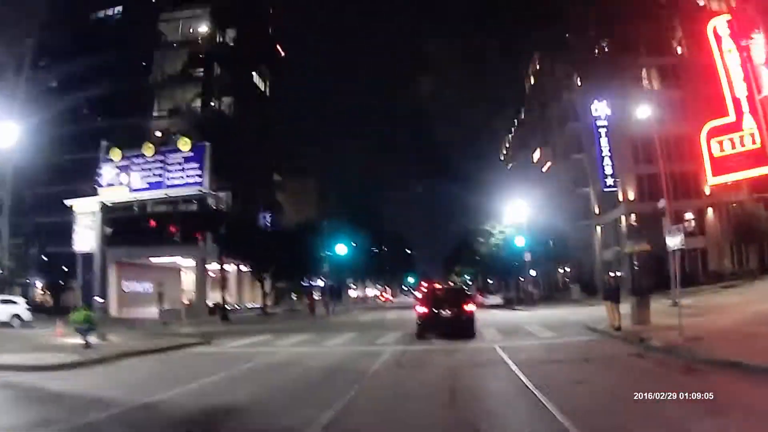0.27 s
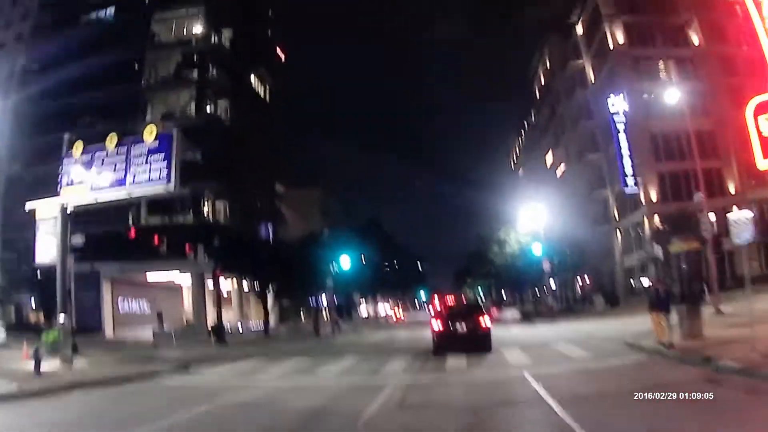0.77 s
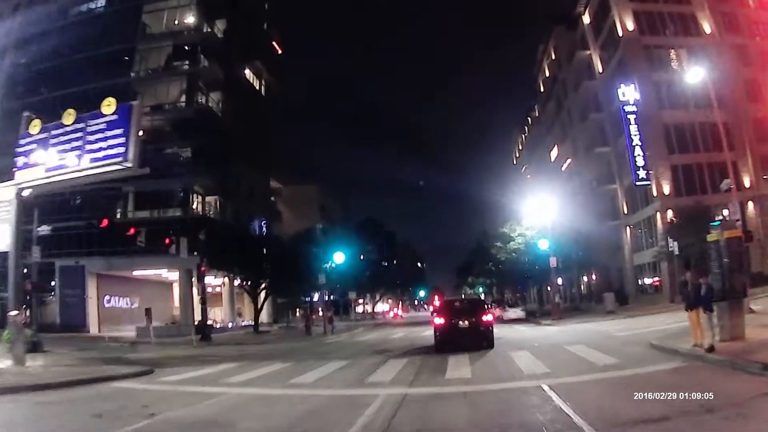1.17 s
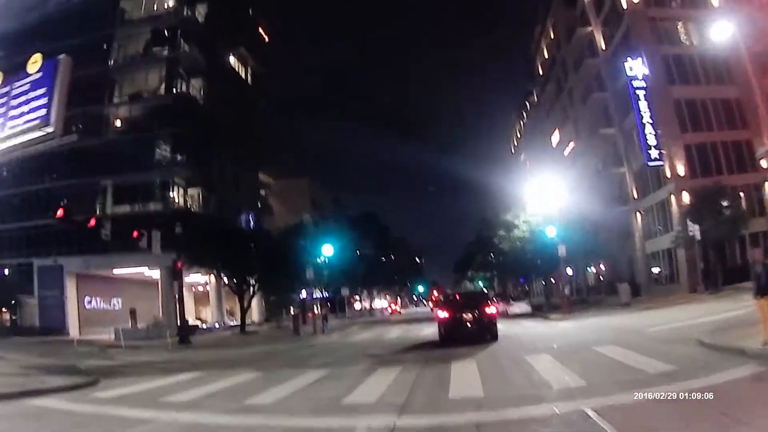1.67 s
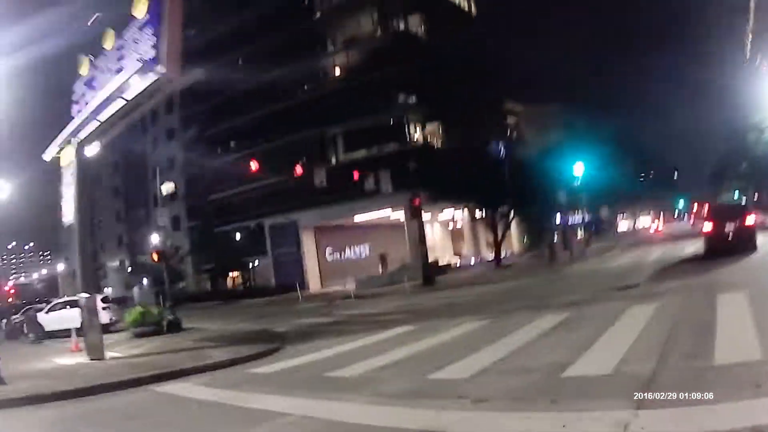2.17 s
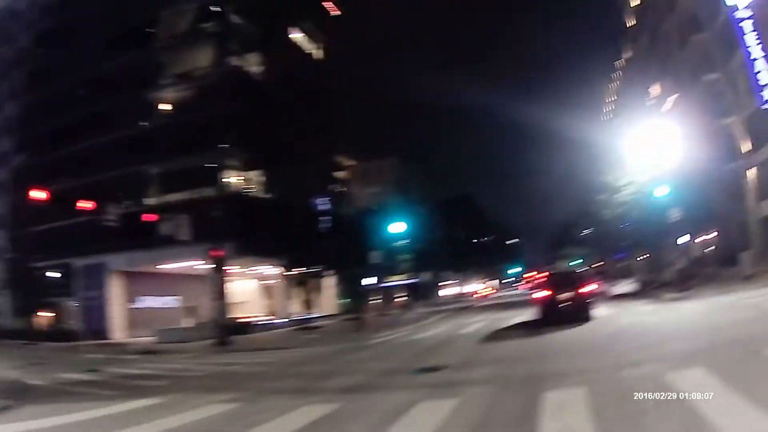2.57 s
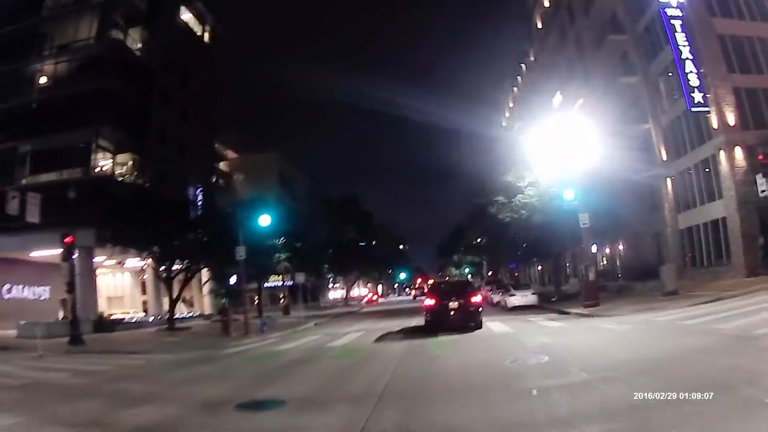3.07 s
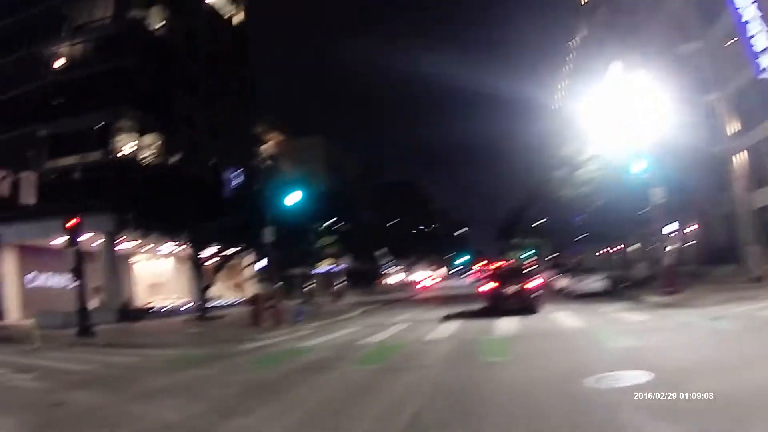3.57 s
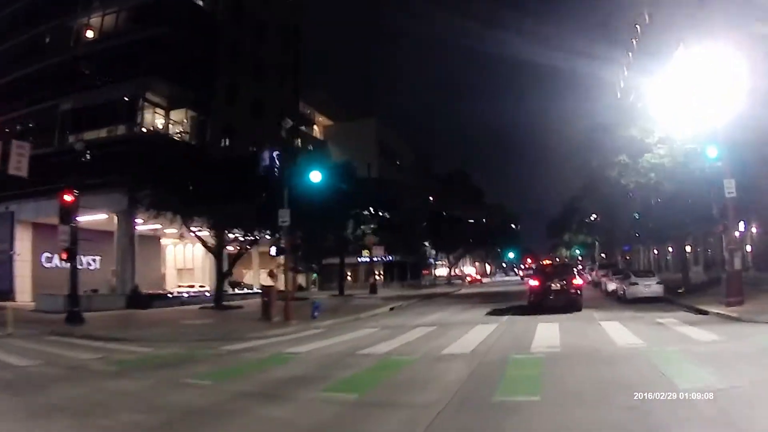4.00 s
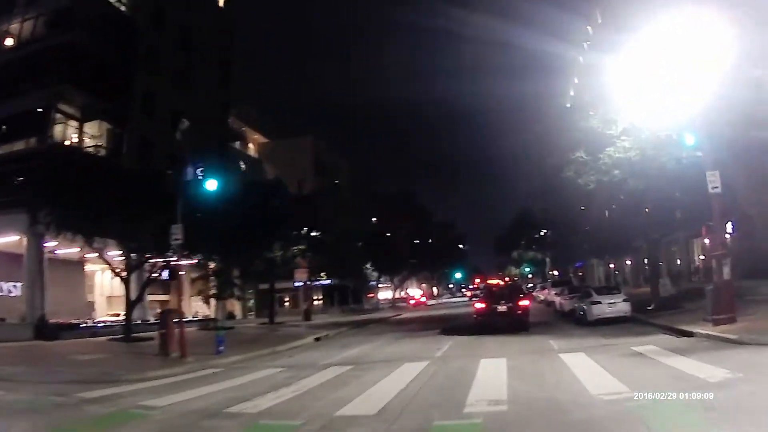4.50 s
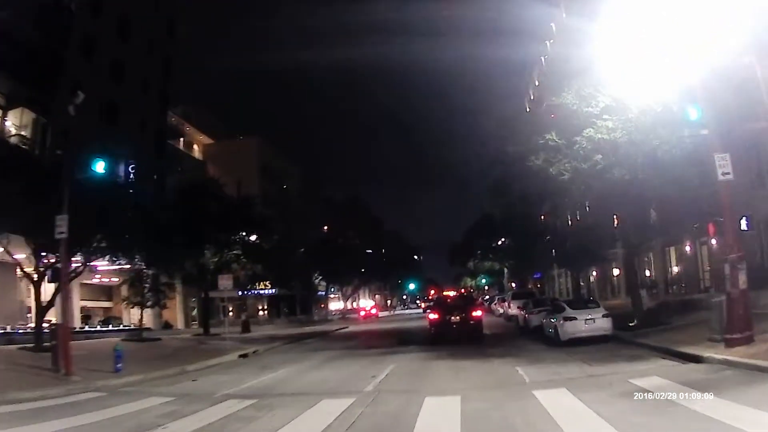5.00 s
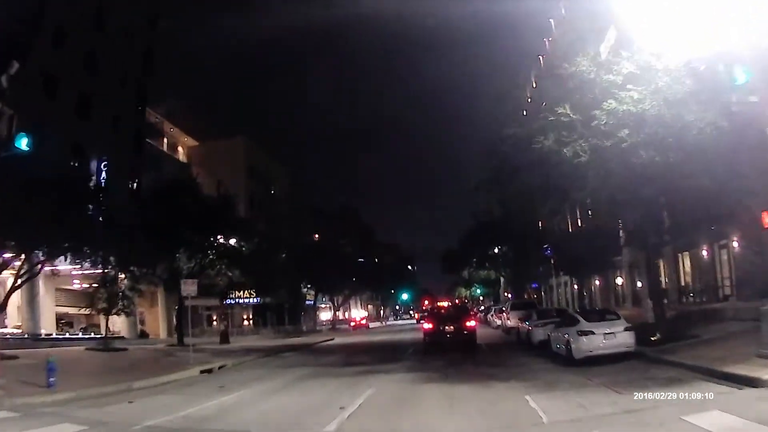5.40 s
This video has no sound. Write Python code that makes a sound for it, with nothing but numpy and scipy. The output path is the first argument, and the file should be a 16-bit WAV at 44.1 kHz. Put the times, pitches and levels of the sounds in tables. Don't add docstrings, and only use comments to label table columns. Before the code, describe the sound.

Close helmet microphone on a city street at night. A small two-stroke engine on a bicycle burbles with separate pops over thin tyre hiss, then after about a second pulls into a continuous raspy drone. At two seconds wind roars and flutters against the camera case for under a second, then eases. The engine runs on steadily with metallic ringing and chain rattle, while low slaps of air keep hitting the case.

```python
import sys
import numpy as np
from scipy import signal
from scipy.fft import rfft, irfft, next_fast_len
from scipy.io import wavfile
from scipy.ndimage import uniform_filter1d, map_coordinates

SR = 44100
rng = np.random.default_rng(int(sys.argv[2]) if len(sys.argv) > 2 else 0)


def generate_wav(signal):
    frames = np.transpose(np.atleast_2d(signal))
    scaled = np.clip(frames, -1, 1) * 32767
    pcm = np.round(scaled).astype(np.int16)
    wavfile.write(sys.argv[1], SR, pcm)


def elevation(decibels):
    levels = np.asarray(decibels, float)
    return 10 ** (levels / 20)


N = 249165

# (time [s], level [dB])
WIND = [(0, -51), (.12, -56), (.68, -58), (.75, -51.5), (.83, -58.5), (1.05, -60), (1.21, -54.5),
        (1.97, -54), (2.05, -45), (2.1, -40.5), (2.23, -38.5), (2.42, -39.5), (2.47, -42), (2.63, -42.5),
        (2.66, -48), (2.74, -50.5), (2.78, -54), (3.82, -56), (3.9, -51.5), (4.16, -51.5), (4.27, -57),
        (4.7, -52.5), (4.76, -47), (4.84, -50.5), (4.92, -52.5)]
# (time [s], turns [Hz])
SHAFT = [(0, 37.5), (1.1, 38.4), (1.3, 39.2), (1.6, 40), (1.95, 40.6), (2.85, 41.75), (3.5, 42.3),
         (4.1, 42.6), (4.5, 42.9), (4.9, 42.95), (5.65, 42.5)]
# (time [s], level [dB])
DRIVE = [(0, -12), (.9, -13), (1.05, -28), (1.2, -1.5), (2.9, -0.5), (3.08, -6), (3.3, -0.5), (3.8, -3),
         (4.22, 0.5), (4.36, -3), (4.55, -1.5), (5.3, -6.5), (5.5, -4), (5.65, -8)]


def unit(x):
    return x / np.sqrt(np.mean(x ** 2) + 1e-20)


def curves(rows):
    s, *cols = np.transpose(rows)
    return [np.interp(np.arange(N) / SR, s, c) for c in cols]


def wobble(rate):
    knots = rng.standard_normal(int(N * rate / SR) + 4)
    return map_coordinates(knots, [np.arange(N) * rate / SR])


def noise():
    return rng.standard_normal(N)


def phase(hz):
    return 2 * np.pi * np.cumsum(hz) / SR


def filtered(x, response):
    m = next_fast_len(N + SR // 2)
    return irfft(rfft(x, m) * response(np.fft.rfftfreq(m, 1 / SR)), m)[:N]


def colour(points):
    hz, db = np.transpose(points)
    return lambda f: elevation(np.interp(np.log(f + 1), np.log(hz + 1), db))


def modes(table):
    def response(f):
        total = 0
        for k, (hz, width, db) in enumerate(table):
            damping = 1j * f * width
            total = total + (-1) ** k * elevation(db) * damping / (hz * hz - f * f + damping)
        return total
    return response


def rung(x, table):
    return unit(filtered(x, lambda f: modes(table)(f) ** 2))


def steadied(x, share, seconds):
    size = int(seconds * SR)
    power = uniform_filter1d(uniform_filter1d(x ** 2, size=size), size=size)
    slow = np.sqrt(abs(power)) + 1e-3
    return unit(x / slow ** share)


def spells(rows, column=2):
    t = np.arange(N) / SR
    return sum(row[column] * np.exp(-((t - row[0]) / row[1]) ** 2) for row in rows)


def bursts(events, rise):
    out, t = np.zeros(N + SR), np.arange(SR // 10) / SR
    swell = (t / rise) ** 2 * np.exp(2 - 2 * t / rise)
    for s, db, hz in events:
        start = max(round((s - rise / 2) * SR), 0)
        out[start:start + len(t)] += elevation(db) * np.sin(2 * np.pi * hz * t) * swell
    return out[:N]


def road(shake):
    # (frequency [Hz], density [dB/Hz])
    hiss_colour = [(4500, -43), (5600, 2.5), (6400, -8), (7000, -10.5), (7500, -18), (7950, -11),
                   (8350, -20), (8750, -11.5), (9450, -10.5), (9900, -28), (10500, -18), (11100, -30.5),
                   (12000, -9.5), (12600, -54)]
    z = signal.stft(noise(), nperseg=1024)[2]
    patches = uniform_filter1d(uniform_filter1d(rng.standard_normal(z.shape), 5, 0), 4, 1)
    depth_db = np.interp(np.linspace(0, SR / 2, len(z)), [6000, 9500, 11500], [1.5, 2.5, 5])[:, None]
    hiss = signal.istft(z * elevation(depth_db * unit(patches)), nperseg=1024)[1][:N]
    duck_db = -.1 * np.maximum(curves(WIND)[0] + 50, 0)
    level = elevation(-70.5 + duck_db + 0.38 * wobble(7.5))
    return level * (1 + 0.22 * shake) * unit(filtered(hiss, colour(hiss_colour)))


def buffeting(flow_db):
    # (frequency [Hz], density [dB/Hz])
    lump_colour = [(13, -82.5), (22, -28.5), (118, -10), (206, -1), (276, 0), (308, -1.5), (350, 0.5),
                   (386, -10.5), (532, -14), (578, -14.5), (620, -16.5), (810, -31), (1360, -120)]
    # (time [s], half length [s], boost [dB], extra bass [dB])
    eddies = [(.06, 0.087, 3.5, -4), (.18, 0.093, 2, 1.5), (.375, 0.033, 8, -4), (.5, 0.05, 6.5, 0),
              (.69, 0.04, 2, 0), (.77, 0.019, 8.5, -3.5), (.97, 0.015, -7, 18), (1.87, 0.07, -1.5, 1),
              (2.07, 0.098, 2, -6), (2.5, 0.069, 4, 2.5), (2.62, .06, 2, -2), (3.0, .1, 0, 1.5),
              (3.19, 0.022, -4, -4), (3.7, 0.15, 1.5, -4.5), (4.05, 0.13, 4.5, -13), (4.33, 0.05, 4, -6.5),
              (4.38, .03, -0.5, 6), (4.5, 0.043, 5.5, -20), (4.73, .05, -0.5, 5), (5.1, 0.12, -3, 6),
              (5.34, 0.055, -5.5, 9), (5.4, .03, 4, -5.5), (5.44, 0.028, -9.5, 11), (5.49, 0.047, 4, -1)]
    shaft_hz = curves(SHAFT)[0]
    ceiling_db = 21
    growth_db = ceiling_db * np.tanh(0.51 * flow_db / ceiling_db)
    body_db = -33 + growth_db + spells(eddies) + 0.85 * wobble(15)
    speed_db = shaft_hz - shaft_hz[0]
    bass_db = -16 + speed_db + spells(eddies, column=3) + 1.2 * wobble(9)

    lumps = elevation(.6 * wobble(30)) * noise()
    high = lambda f: 1 / (1 + (145 / (f + 1)) ** 8)
    body = unit(filtered(lumps, lambda f: colour(lump_colour)(f) * high(f)))
    bass = unit(filtered(lumps, lambda f: colour(lump_colour)(f) * (1 - high(f))))
    return elevation(body_db - 4.5) * steadied(body, .35, .05) + elevation(body_db + bass_db - 1.26) * bass


def rush(flow_db):
    # (frequency [Hz], density [dB/Hz])
    gust_colour = [(240, -25), (400, 3), (475, -0.5), (872, -7), (1500, -11), (1900, -7.5), (2110, -23.5),
                   (2400, -23), (3120, -72.5), (5280, -120)]
    # (frequency [Hz], density [dB/Hz])
    fizz_colour = [(1350, -23.5), (2300, 2.5), (2760, 4), (3140, 1), (3900, -9.5), (5140, -9.5),
                   (6360, -17.5), (8270, -68), (14000, -120)]
    # (frequency [Hz], width [Hz], boost [dB])
    cavities = [(2010, 180, 2.5), (3100, 120, 9.5), (5130, 300, 14)]
    # (frequency [Hz], width [Hz], level [dB])
    gap = [(1940, 120, 0)]
    # (time [s], half length [s], boost [dB])
    tears = [
        (2.24, 0.036, 6),
        (2.31, 0.041, 5.5),
        (2.42, 0.028, 5.5),
        (2.62, 0.03, 4.5),
        (2.72, 0.011, 5),
    ]
    gust_db = flow_db - 55 + 0.75 * wobble(12)
    tearing_db = 0.64 * np.maximum(flow_db - 9, 0)
    fizz_db = -69.5 + 0.67 * flow_db + tearing_db + spells(tears) + wobble(14)

    air = elevation(.4 * wobble(14) + 1.1 * wobble(60)) * noise()
    through_case = lambda points: unit(filtered(
        air, lambda f: colour(points)(f) * (1 + abs(modes(cavities)(f)))))
    whistle = rung(air, gap) * (gust_db > -44) / 3
    return (elevation(gust_db + 8) * through_case(gust_colour)
            + elevation(fizz_db + 6) * through_case(fizz_colour) + elevation(-49.5) * whistle)


def air_slaps():
    # (time [s], peak [dB], frequency [Hz])
    slaps = [(0.118, -20, 216), (0.368, -22, 222), (.02, -26, 229), (.39, -24, 300), (.43, -26, 245),
             (.478, -22, 260), (.51, -24, 300), (.635, -25, 260), (.705, -24, 269), (.762, -28, 296),
             (.8, -26, 270), (.908, -28, 200), (1.025, -29, 350), (1.096, -23, 300), (1.183, -25, 237),
             (1.628, -24, 231), (1.784, -25, 283), (1.973, -25, 361), (2.047, -22, 264), (2.2, -17, 215),
             (2.29, -18, 200), (2.562, -17, 285), (2.6, -18, 250), (2.645, -22, 250), (2.12, -20, 200),
             (2.33, -20, 420), (2.44, -19, 480), (3.912, -22, 296), (4.219, -23, 253), (4.78, -22, 330),
             (2.359, -11.5, 213), (2.499, -11.5, 227), (3.724, -18.5, 236), (4.488, -21, 245),
             (4.735, -11, 205), (4.939, -15, 225), (5.17, -15, 208), (5.492, -17.5, 224)]
    return elevation(-8.0) * bursts(slaps, rise=.005)


def wind():
    flow_db = curves(WIND)[0] + 55
    return buffeting(flow_db) + rush(flow_db) + air_slaps()


def firings():
    # (time [s], peak [dB])
    strong = [(0.072, -37.5), (0.2079, -45), (0.288, -37.5), (0.4, -32.5), (0.4938, -38.5), (0.607, -34),
              (0.7058, -46), (0.806, -42), (0.9038, -40.5), (0.984, -44.5), (1.065, -40.5), (1.1483, -39.5),
              (1.2226, -30), (1.305, -32.5), (1.3773, -32), (1.4516, -35.5), (1.5245, -33.5),
              (1.6206, -34.5), (1.682, -30), (1.7809, -36.5), (1.8851, -32), (1.9779, -34), (2.125, -34),
              (2.254, -34.5), (2.4114, -37.5), (2.6264, -35), (2.7242, -39), (2.819, -35), (2.9377, -31.5),
              (3.0634, -39), (3.1632, -38), (3.318, -33), (3.4036, -38), (3.4989, -36.5), (3.6, -39.5),
              (3.694, -34.5), (3.8117, -35), (3.933, -39.5), (4.0048, -45), (4.094, -38.5), (4.1919, -37),
              (4.2832, -39.5), (4.3784, -39.5), (4.4396, -37), (4.5186, -35.5), (4.5994, -45),
              (4.6775, -34.5), (4.773, -33.5), (4.866, -35), (4.9332, -39), (5.001, -33.5), (5.0978, -35),
              (5.188, -37.5), (5.255, -35), (5.367, -34.5), (5.4594, -38.5), (5.556, -36.5)]
    return np.c_[strong, 4 * rng.standard_normal((len(strong), 2))]


def bang_train(bangs, t60, colour_column=None):
    kicks = np.zeros(N)
    for row in bangs:
        extra_db = 0 if colour_column is None else row[colour_column]
        kicks[round((row[0] - 0.0091) * SR)] = elevation(row[1] + extra_db)
    t = np.arange(SR // 5) / SR
    return signal.fftconvolve(kicks, elevation(-60 * t / t60) * (1 - np.exp(-t / 0.0046)) ** 2)[:N]


def puffs(turn, sharpness):
    return np.exp(sharpness * np.cos(turn))


def clutch_cover(bang):
    # (frequency [Hz], width [Hz], level [dB])
    cover = [(1970, 100, 0), (2215, 110, -12)]
    return elevation(-57.5) * rung((1.5 + 0.26 * bang) * noise(), cover)


def chain(turn, bang, frame_db):
    # (frequency [Hz], width [Hz], level [dB])
    links = [(3084, 148, 0), (3580, 140, -0.5), (3710, 83, -1.5), (3890, 98, 0.5), (4080, 150, -0.5),
             (4520, 205, 1), (4968, 290, 2), (5370, 300, -2), (2383, 144, 0)]
    rattle = (1.5 * puffs(turn, 0.25) + 0.5 * bang) * noise()
    return elevation(0.3 * (frame_db + 46.5) - 58.5) * rung(rattle, links)


def frame(turn, bang, bangs, frame_db):
    # (frequency [Hz], width [Hz], level [dB])
    tubes = [(1591, 118, 2), (1717, 224, -2), (1996, 370, -6.5), (2150, 184, -6.5)]
    blow_hz = tubes[0][0] - 10 + 60 * np.tanh(bang) + 30 * wobble(22)
    blow = unit(bang_train(bangs, t60=.09)) * np.sin(phase(blow_hz))
    ringing = rung((1.1 * puffs(turn, .4) + .6 * bang) * noise(), tubes)
    return elevation(frame_db + 0.67) * unit(ringing + .45 * blow)


def cooling_fin(bang):
    # (frequency [Hz], width [Hz], level [dB])
    blade = [(1434, 24, 0)]
    # (time [s], half length [s], boost [dB])
    caught = [(.12, 0.086, 8.5), (.24, 0.05, 2), (.33, .03, 2), (.44, .05, 2), (.64, .05, 2), (.88, .05, 1),
              (.53, 0.084, 5), (.76, 0.024, 2), (1.0, 0.1, -6), (1.19, 0.048, 4), (1.55, 0.13, 6.5),
              (1.7, 0.057, 0.5), (1.84, 0.11, 9), (2.75, 0.071, 2.5), (2.9, .03, 6), (3.1, .12, 6),
              (3.33, .05, 7), (3.43, .03, 7), (3.9, .07, 4), (3.65, 0.11, -6), (4.48, 0.029, 6),
              (4.7, 0.059, 8.5), (5.04, .03, 5), (5.32, 0.045, 10.5)]
    shaft_hz = curves(SHAFT)[0]
    swing_db = 1.8 * np.cos(phase(shaft_hz / 4 - .28))
    fade_db = 1.32 * (shaft_hz - shaft_hz[0])
    fin_db = -51 - fade_db + spells(caught) + swing_db + .8 * wobble(9.1)
    hum = np.sin(phase(blade[0][0] + 7 * wobble(20)))
    ringing = steadied(rung((3.8 + bang) * noise(), blade), .6, .03)
    return elevation(fin_db + 1.4) * unit(0.9 * ringing + 0.45 * hum)


def silencer(turn, sharpness, bang, strokes):
    # (frequency [Hz], width [Hz], level [dB])
    cavity = [(836, 54, 0)]
    gas = (unit(puffs(turn, sharpness)) + 0.77 * bang) * noise()
    ringing = rung(gas + 0.55 * sharpness * strokes, cavity)
    return elevation(-46 + curves(DRIVE)[0] + .5 * wobble(8) - 3.0) * steadied(ringing, .8, .03)


def exhaust_pipe(turn, sharpness, bangs, strokes, pull_db):
    # (frequency [Hz], width [Hz], level [dB])
    pipe = [(658.5, 45, 1.5), (599, 38, -0.5), (702, 30, -2)]
    teeth = np.exp(.4 * np.cos(5 * turn))
    bang = unit(bang_train(bangs, t60=0.38, colour_column=3))
    gas = (unit(puffs(turn, sharpness)) * teeth + 0.37 * bang) * noise()
    ringing = rung(gas + 1.3 * sharpness * strokes, pipe)
    hard_db = 3.5 * (sharpness - sharpness.mean())
    return elevation(-43.5 + 0.11 * pull_db + hard_db + .7 * wobble(7) - 3.5) * steadied(ringing, .6, .06)


def bang_edges(bangs, tone_db):
    # (frequency [Hz], width [Hz], level [dB])
    crack_modes = [(960, 260, 0), (1820, 220, 1), (2500, 500, -8)]
    charge = elevation(-.9 * (tone_db + 50)) * bang_train(bangs, t60=0.15, colour_column=2)
    thump = rung(charge * noise(), [(295, 225, 0)])
    crack = rung(bang_train(bangs, t60=.07, colour_column=2) * noise(), crack_modes)
    return elevation(-50.0) * thump + elevation(-59 + .5 * curves(DRIVE)[0]) * crack


def lone_pops():
    # (time [s], peak [dB], frequency [Hz])
    pops = [(0.014, -30.5, 684), (0.078, -34, 683), (0.185, -31.5, 662), (0.334, -53, 610), (0.4, -37, 661),
            (0.504, -35, 705), (0.608, -40, 647), (0.728, -37, 730), (0.819, -40, 648), (0.887, -45, 630),
            (0.99, -41, 628), (1.141, -36, 737)]
    return elevation(-3.0) * bursts(pops, rise=0.0105)


def exhaust_tone(turn):
    # (multiple, level [dB])
    early_orders = [(1, -22), (2, -14), (3, -11), (4, -12), (5, -12), (6, -2), (7, 0), (8, -14), (9, -2),
                    (10, -16)]
    # (multiple, level [dB])
    steady_orders = [(1, -22), (2, -13), (3, -10), (4, -10), (5, -1), (6, 0), (7, 0), (8, -3), (9, -6),
                     (10, -14)]
    settled = curves([(2, 0.089), (2.7, 0.8)])[0]
    tone = np.zeros(N)
    for (k, db), (_, early_db) in zip(steady_orders, early_orders):
        order_db = early_db + settled * (db - early_db) + 0.86 * wobble(4.73)
        tone += elevation(order_db) * np.sin(k * turn + 2 * np.pi * rng.random())
    return unit(tone)


def engine(bangs):
    # (time [s], tone [dB], puff sharpness)
    load = [(0, -41.5, 0.5), (1.05, -53.5, 0.35), (1.2, -36, 0.94), (1.5, -36, 1), (2, -35.5, 0.67),
            (2.7, -35.5, 0.62), (3.1, -41.5, 0.7), (3.5, -36, 0.41), (4, -38, 0.3), (4.6, -36, 0.13),
            (5, -40.5, 0.42), (5.3, -39, 0.31), (5.65, -49.5, 0.42)]
    turn = phase(curves(SHAFT)[0]) + 0.043 * wobble(5.6)
    tone_db, sharpness = curves(load)
    pull_db = tone_db + 36
    new_turn = np.diff(np.floor(turn / (2 * np.pi)), prepend=0)
    strokes = unit(new_turn * elevation(tone_db + 5.3 * noise()))
    bang = unit(bang_train(bangs, t60=0.19))
    frame_db = -45.5 + 0.26 * pull_db + 0.5 * wobble(7.9)

    metal = clutch_cover(bang) + chain(turn, bang, frame_db) + frame(turn, bang, bangs, frame_db)
    metal += cooling_fin(bang) + silencer(turn, sharpness, bang, strokes)
    metal += exhaust_pipe(turn, sharpness, bangs, strokes, pull_db)
    return metal + bang_edges(bangs, tone_db) + lone_pops() + elevation(tone_db) * exhaust_tone(turn)


def scene():
    bangs = firings()
    shake = unit(bang_train(bangs, t60=.18))
    return (road(shake) + wind() + engine(bangs))[None]


def low_pass(x):
    return signal.sosfilt(signal.butter(12, 12250, fs=SR, output="sos"), x)


def record(dry):
    # (frequency [Hz], width [Hz], depth [0-1])
    notches = [(773, 41, 0.13), (2650, 140, 0.24), (3796, 68, 0.4)]

    def port(f):
        gain = f * f / (f * f + 25 ** 2)
        for hz, width, depth in notches:
            gain = gain * (1 - np.clip(depth, 0, .95) * np.exp(-((f - hz) / width) ** 2))
        return gain
    mixed = filtered(dry[0], port)[None]
    return low_pass(mixed)


dry = scene()
out = record(dry)
generate_wav(out)
```